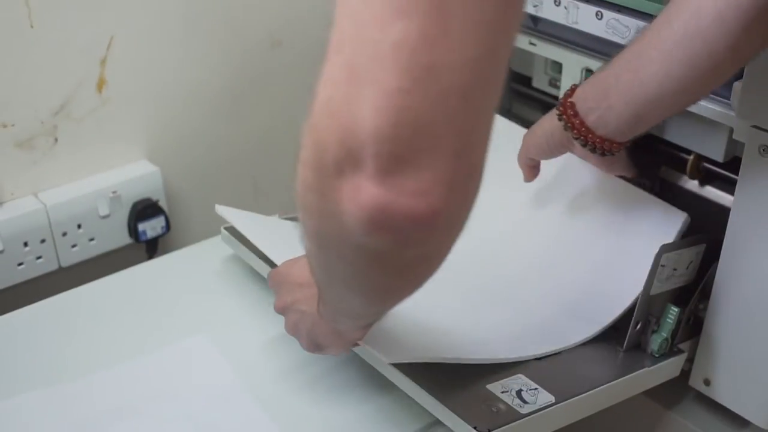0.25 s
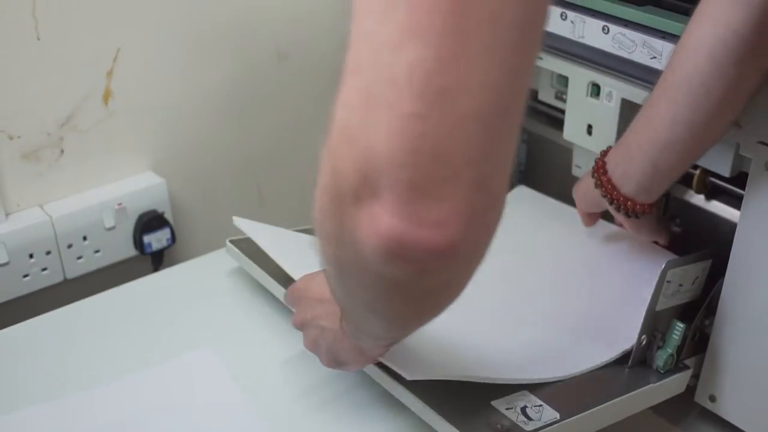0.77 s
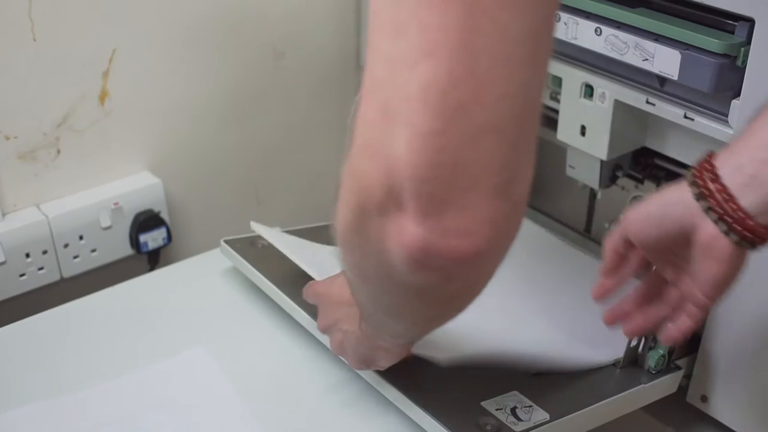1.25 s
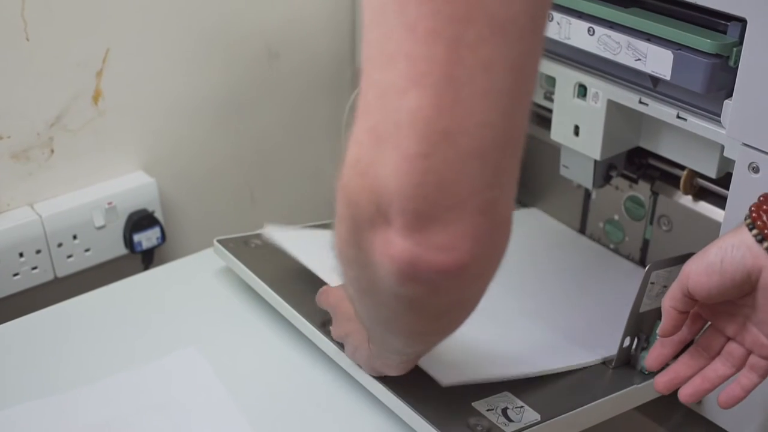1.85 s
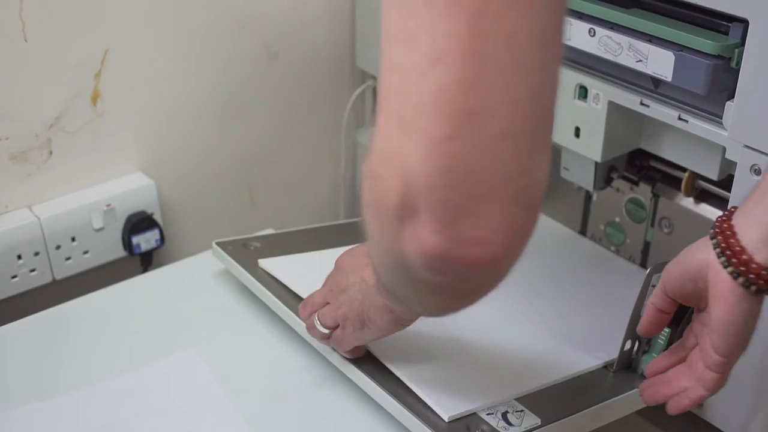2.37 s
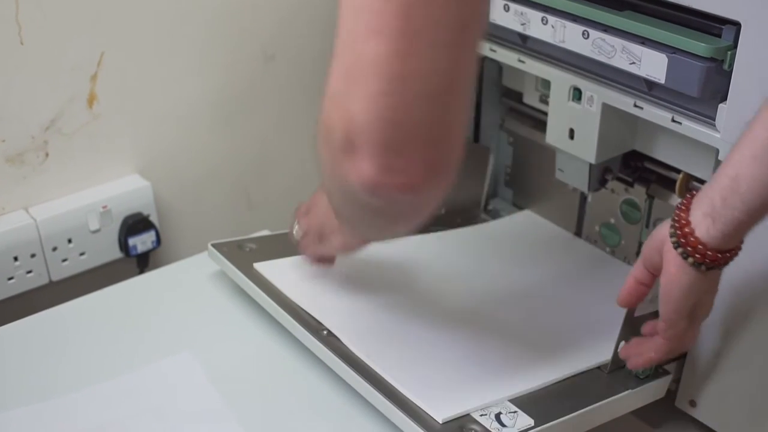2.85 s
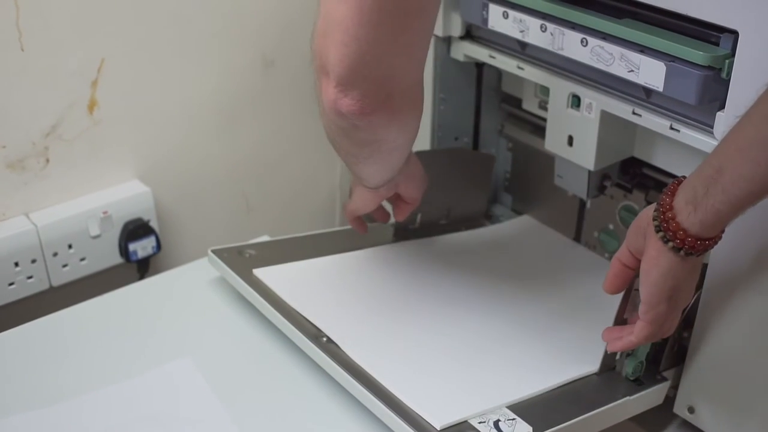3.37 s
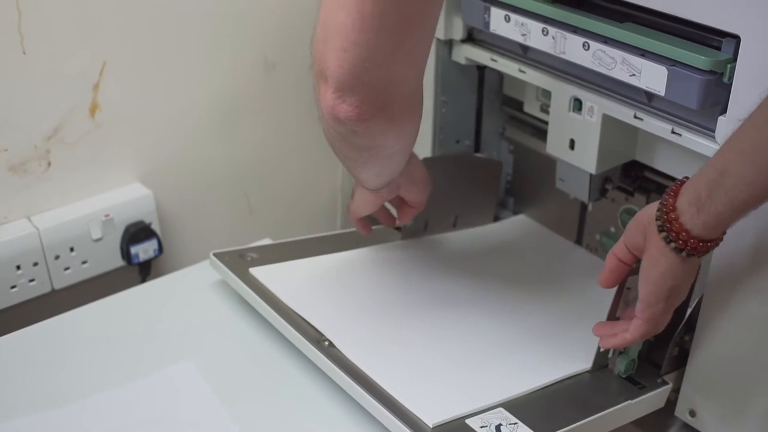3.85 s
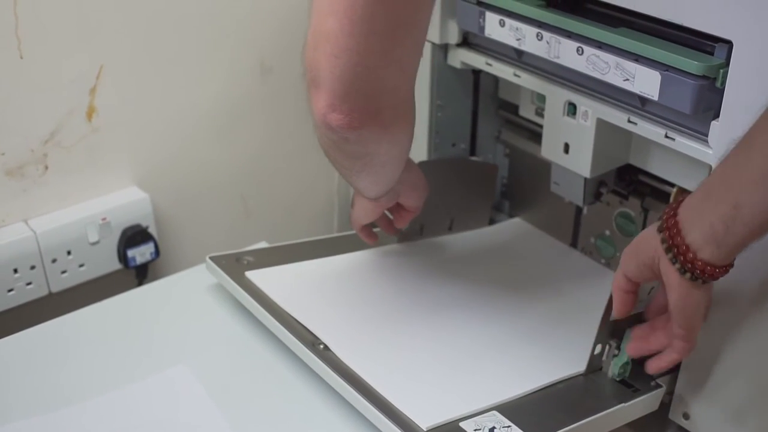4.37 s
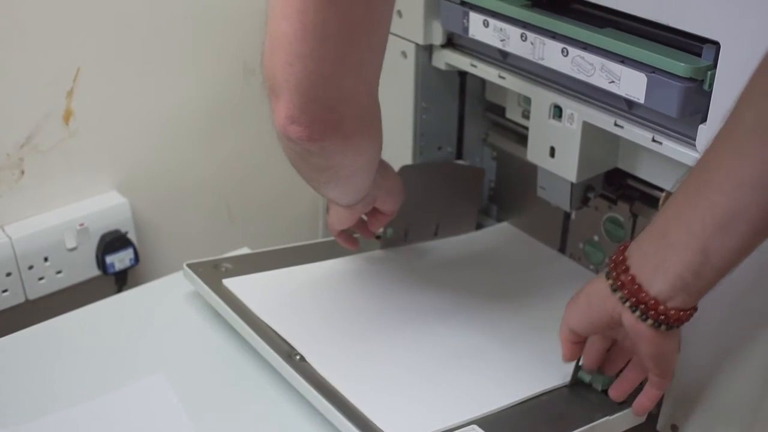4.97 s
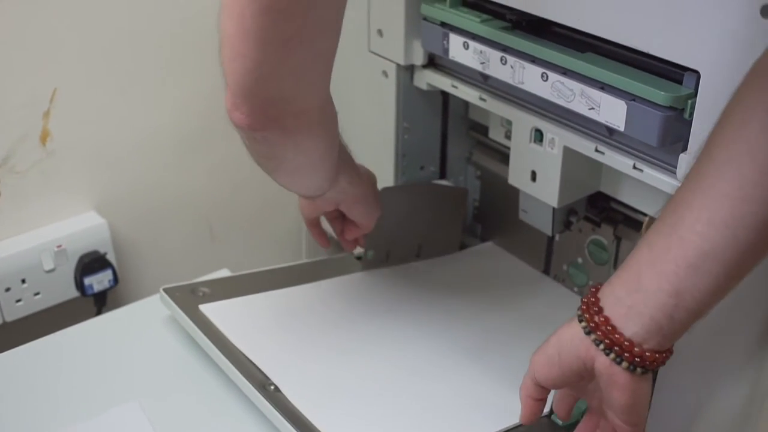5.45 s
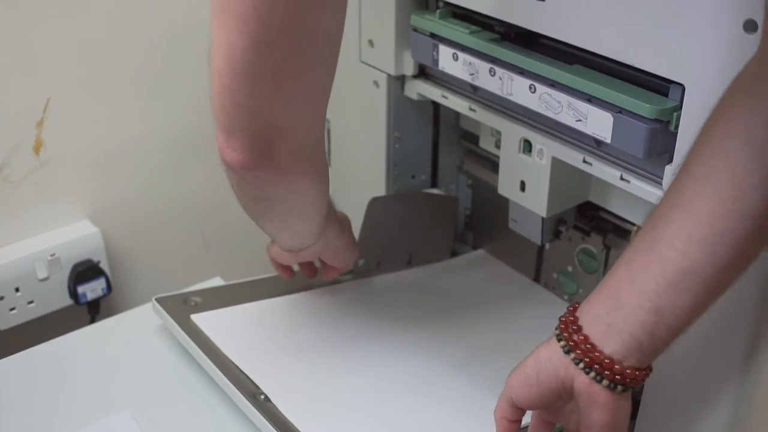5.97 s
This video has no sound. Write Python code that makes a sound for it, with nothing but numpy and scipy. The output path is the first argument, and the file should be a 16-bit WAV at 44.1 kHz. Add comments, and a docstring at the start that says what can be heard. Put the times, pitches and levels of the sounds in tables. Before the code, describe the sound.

A thick stack of paper drops onto a metal tray with heavy thumps, then slides, taps and guide clicks over faint machine hum.

```python
"""A small hard-walled room with a humming machine fan, heard through two unequal capsules.
A stack of paper is dropped, slid and squared on a sheet-metal feed tray; side guides scrape in and click.
Each blow is a noise burst of tiny contacts that rings the tray's modes; strokes are coloured friction noise.
Small steel parts chink as rattled resonances, and delayed trips between the walls make the room's answer."""
import sys
import numpy as np
from scipy import signal
from scipy.fft import rfft, irfft, next_fast_len
from scipy.io import wavfile
from scipy.ndimage import uniform_filter1d

SR = 44100
rng = np.random.default_rng(int(sys.argv[2]) if len(sys.argv) > 2 else 0)


def output_pcm(signal):
    """Save a mono or channel-first signal as 16-bit PCM at the path in sys.argv[1].

    Samples are clipped to [-1, 1] before scaling.
    """
    pcm = np.clip(np.atleast_2d(signal).T, -1, 1) * 32767
    wavfile.write(sys.argv[1], SR, np.round(pcm).astype(np.int16))


N = 273861


def from_db(db):
    """Amplitude factor for a level in dB."""
    return 10 ** (np.asarray(db) / 20)


def rms_one(x):
    """Scale a sound, all channels together, to rms 1."""
    return x / np.sqrt(np.mean(x ** 2) + 1e-20)


def at_hz(points, hz):
    """Read a curve over log frequency, flat beyond its ends."""
    point_hz, values = np.array(points).T
    return np.interp(np.log(hz), np.log(point_hz), values)


def bins_hz(length):
    """Frequencies of a spectrum's bins, kept off zero."""
    return np.maximum(np.fft.rfftfreq(length, 1 / SR), 1)


def panned(db):
    """Left and right gains for a level difference in dB, left over right."""
    return from_db(np.multiply.outer([.5, -.5], db))


def left_right(mid, side, mid_power, side_power):
    """Mid reaches both channels alike, side reaches them with opposite sign."""
    return np.sqrt(mid_power) * mid + np.sqrt(side_power) * side * np.array([[1], [-1]])


def spread(share):
    """Two channels of white noise with a share that is unlike left and right."""
    mid, side = rng.standard_normal((2, N))
    return left_right(mid, side, 1 - share, share)


def drift(rate_hz):
    """Chance wandering mostly slower than rate_hz, with spread 1."""
    step, settle = 40, 2000   # samples per slow value; slow values dropped while the filter settles
    r = np.exp(-2 * np.pi * rate_hz * step / SR)
    white = rng.standard_normal(N // step + 2 + settle)
    slow = signal.lfilter([1], [1, -2 * r, r * r], white)[settle:]
    return np.interp(np.arange(N) / step, np.arange(len(slow)), rms_one(slow))


def ring(x, hz, t60_s):
    """A damped resonance: a unit click sets a sine of height 1 ringing."""
    r = from_db(-60 / (t60_s * SR))
    w = 2 * np.pi * hz / SR
    return signal.lfilter([0, np.sin(w)], [1, -2 * r * np.cos(w), r * r], x + 1e-18)


def narrow(hz, width_hz):
    """Noise in one resonance, rms 1: the narrower it is, the longer it rings."""
    t60_s = np.log(1000) / np.pi / width_hz
    return rms_one(ring(rng.standard_normal(N), hz, t60_s))


def band(x, low_hz, high_hz):
    """Pass the sound between two frequencies."""
    return signal.sosfilt(signal.butter(2, [low_hz, high_hz], "band", fs=SR, output="sos"), x)


def highpass(x, low_hz):
    """Remove the sound below a frequency."""
    return signal.sosfilt(signal.butter(2, low_hz, "high", fs=SR, output="sos"), x)


def coloured(x, spectrum):
    """Steady colouring to rms 1, falling away below the spectrum's first point."""
    hz = bins_hz(N)
    bass_fall = np.minimum(1, hz / spectrum[0][0]) ** 2
    return rms_one(irfft(rfft(x) * from_db(at_hz(spectrum, hz)) * bass_fall, N))


def banded(white, gain_at):
    """Half-octave bands of stereo noise, alike left and right in the bass, each under gain_at(hz)."""
    # likeness of left and right: hz, correlation
    likeness = [(60, 1), (250, 0.81), (1000, 0.74), (3000, 0.15), (10000, 0.53)]
    edges_hz = 22 * 2 ** np.arange(0, 9.8, .5)
    out = 0
    for k, (low, high) in enumerate(zip(edges_hz, edges_hz[1:])):
        mid, side = band(white[k % 2], low, high)   # neighbouring bands draw on different noise
        hz = np.sqrt(low * high)
        alike = at_hz(likeness, hz)
        out = out + gain_at(hz) * left_right(mid, side, 1 + alike, 1 - alike)
    return out


def machine(patchy_db):
    """Broad fan noise with flickering bands, a wavering whine of narrow resonances, and the cabinet's low shudder."""
    # colour of the fan noise: hz, relative_level_db (per Hz)
    fan_colour = [(15, -35), (25, -14), (64, 3), (285, -2.5), (427, -5), (476, -7), (560, -18.5),
                  (754, -7.5), (911, -4.5), (1440, -20), (1700, -12), (2160, -17.5), (8830, -29.5),
                  (13600, -25.5), (16000, -41)]
    # fan whine: pitch_hz, width_hz, level_db
    whines = [(442, 40, -68.5), (573.4, 72, -65), (1150, 120, -76)]
    # level of the cabinet's shudder: time_s, level_db
    shudder_level = [(0.0, -38), (0.05, -39), (0.31, -66), (0.41, -32.5), (0.55, -63), (0.81, -52.5),
                     (1.19, -70.5), (1.38, -53.5), (1.66, -56), (1.8, -47), (1.94, -73), (2.16, -57),
                     (2.56, -74.5), (2.8, -55), (2.9, -70), (3.11, -45), (3.34, -66), (4.39, -70.5),
                     (4.44, -53.5), (4.6, -75), (5.0, -53), (5.57, -80), (5.67, -56.5), (6.21, -73)]

    def band_gain(hz):
        return from_db(at_hz(fan_colour, hz) + patchy_db * drift(2.2))

    fan = from_db(-61) * rms_one(banded(rng.standard_normal((2, 2, N)), band_gain))
    whine = sum(from_db(db) * narrow(hz, width_hz) for hz, width_hz, db in whines)
    time_s, level_db = np.transpose(shudder_level)
    shudder_gain = from_db(np.interp(np.arange(N) / SR, time_s, level_db))
    shudder = shudder_gain * rms_one(band(narrow(54.6, width_hz=35), 28, 92))
    return fan + whine + shudder


def room(x):
    """Sound circles between the walls, losing level by band on each trip, and is scattered by the furniture."""
    # decay of the room: hz, t60_s
    decay = [(60, 0.61), (250, 0.45), (1000, 0.36), (4000, 0.46), (9000, 0.095), (15000, 0.72)]
    # wall-to-wall trips, two rows: heard alike left and right, heard unlike: trip_ms
    paths_ms = [
        [5.3, 7.1, 8.9, 11.3, 13.9, 16.7, 19.1, 22.3, 25.9, 29.3, 33.1, 37.7],
        [6.1, 9.7, 12.1, 14.9, 17.3, 20.9, 23.3, 27.1, 31.3, 35.3],
    ]
    # short delays of the scattering: delay_ms
    scatter_ms = [1.3, 2.9, 4.7]
    # likeness of the echoes left and right: hz, correlation
    echo_likeness = [(60, .99), (250, .96), (500, .88), (1000, .75), (2000, .68), (8000, .55)]
    size = next_fast_len(N + SR)
    hz = bins_hz(size)

    def delay(ms):
        return np.exp(-2j * np.pi * hz * ms / 1000)

    def circling(ms, sign):
        trip = from_db(loss_db_per_ms * ms) * delay(ms)
        return sign * trip / (1 - trip)   # one trip, two trips, three...

    loss_db_per_ms = at_hz([(f, -.06 / t60_s) for f, t60_s in decay], hz)
    echoes = np.array([sum(circling(ms, (-1) ** k) for k, ms in enumerate(row)) for row in paths_ms])
    # so many paths overlap that no broad band is favoured
    broad_power = uniform_filter1d(abs(echoes) ** 2, size=size // 600, axis=1)
    mid, side = echoes / np.sqrt(broad_power)
    # all-pass: smears in time, keeps the balance of pitches
    scatter = np.prod([(delay(ms) - .6) / (1 - .6 * delay(ms)) for ms in scatter_ms], axis=0)
    alike = at_hz(echo_likeness, hz)
    answer = scatter * left_right(mid, side, 1 + alike, 1 - alike)
    return irfft(rfft(x.mean(axis=0), size) * answer, size)[:, :N]


def sliding(rough_db, unlike):
    """Friction noise of paper fibres, made grainy by a fast uneven grip; each stroke swells, holds and fades."""
    # strokes: full_speed_s, swell_s, hold_s, fade_s, sheet_hiss_db, edge_rasp_db, guide_rub_db
    strokes = [(0.001, 0.0056, 0.053, 0.04, -39.5, -68, -44.5), (0.159, .06, 0.069, 0.083, -48.5, -62, -56),
               (0.88, 0.1, 0.019, 0.059, -46, -68, -87), (0.95, 0.038, .01, 0.1, -56, -72, -79),
               (1.202, 0.12, 0.044, 0.14, -53.5, -58.5, -62.5),
               (1.298, .12, 0.027, 0.48, -48.5, -53.5, -56), (1.428, .03, 0.0063, 0.039, -55, -56, -54.5),
               (1.493, 0.05, 0.014, 0.19, -55, -51, -59.5), (1.632, .1, 0.075, 0.032, -68, -68, -84),
               (1.954, 0.039, 0.033, 0.073, -59, -70, -64), (2.112, 0.09, 0.0085, 0.032, -31, -45, -41.5),
               (2.139, 0.0072, .008, 0.045, -13.5, -23, -44), (2.189, 0.044, 0.025, .15, -37, -38.5, -54),
               (2.312, 0.084, 0.024, 0.099, -50, -68, -59.5), (2.931, .07, .04, .1, -68, -76, -71.5),
               (2.994, 0.047, 0.011, 0.16, -54, -67, -62), (3.056, 0.013, 0.05, 0.074, -42.5, -58.5, -69.5),
               (3.164, 0.034, .005, 0.029, -35, -57, -61), (3.191, 0.033, 0.036, 0.19, -48.5, -73.5, -64.5),
               (3.391, .06, 0.026, 0.11, -81, -58.5, -63.5), (3.467, 0.089, 0.036, 0.15, -61, -62.5, -52),
               (3.769, 0.029, 0.0071, 0.13, -71, -46, -62), (4.114, 0.011, 0.008, .12, -75, -56, -57),
               (4.678, 0.029, 0.026, 0.066, -60, -63.5, -69.5),
               (4.733, 0.018, 0.0092, 0.076, -39.5, -43, -68),
               (4.867, 0.0071, 0.0048, 0.15, -35.5, -46.5, -44.5),
               (5.213, 0.0092, 0.005, 0.055, -59, -66.5, -56.5),
               (5.469, 0.013, 0.055, 0.084, -60.5, -89, -68), (5.63, 0.004, 0.02, 0.14, -40, -54, -46.5),
               (5.765, 0.22, 0.087, 0.15, -38.5, -77, -46)]
    # sheets hissing over each other: hz, relative_level_db (per Hz)
    sheet_colour = [(4000, -17.5), (7000, -7.5), (10000, 1), (13000, -3), (15500, 2.5)]
    # paper edge rasping on metal: hz, relative_level_db (per Hz)
    rasp_colour = [(900, -22), (1700, -13), (2600, -12), (3050, -7), (3300, 0), (3550, -6), (4000, -12),
                   (6000, -26)]
    # guide rubbing: hz, relative_level_db (per Hz)
    scrape_colour = [(2500, -9.5), (4000, -4.5), (5200, 0.5), (6500, -2.5), (8000, -4), (11000, -50)]
    range_db = 30   # drop over one swell or fade time
    t = np.arange(0, N, 32) / SR
    gains = 0
    for start, swell, hold, fade, *levels_db in strokes:
        before = (start - t) / max(swell, .002)
        after = (t - start - hold) / max(fade, .002)
        away = np.maximum(np.maximum(before, after), 0)
        gains = gains + np.outer(from_db(levels_db), from_db(-range_db * away))
    out = 0
    for gain, colour in zip(gains, [sheet_colour, rasp_colour, scrape_colour]):
        grip = spread(unlike) * from_db(rough_db * drift(220))
        out = out + np.interp(np.arange(N) / SR, t, gain) * coloured(grip, colour)
    return out


def pings():
    """Loose steel parts chink with a few ms of rattle; modes far from the most excited pitch are weaker."""
    # chinks of the guides' small steel parts: start_s, relative_level_db, most_excited_hz
    chinks = [(2.0544, -33.5, 8900), (2.9851, -44, 15100), (3.057, -29.5, 9100), (3.162, -19.5, 10300)]
    # modes of the steel parts: pitch_hz, relative_level_db, t60_s
    steel_modes = [(8040, -2, .03), (9250, -6, .07), (9390, -6, .06), (10230, -5, .09), (10300, -1, .13),
                   (10420, -4, .09), (14950, 2, .07), (15200, 0, .06)]
    out, age = np.zeros(N), np.arange(SR // 20) / SR
    for start, db, best_hz in chinks:
        rattle = np.zeros(N)
        rattle[round(start * SR):][:len(age)] = rng.standard_normal(len(age)) * np.exp(-age / .005)
        for hz, mode_db, t60_s in steel_modes:
            octaves_away = abs(np.log2(hz / best_hz))
            # -34 dB offsets the build-up of the rattle in the modes
            out += from_db(db + mode_db - 34 - 15 * octaves_away) * ring(rattle, hz, t60_s)
    return out * panned(7.8)[:, None]


def blows(ring_db):
    """A burst of tiny contacts swells and dies: a thud sloping away from its strongest pitch, ringing the tray."""
    # blows on the tray: start_s, level_db, strongest_hz,
    # fall_below_db_per_octave, fall_above_db_per_octave, contact_s
    hits = [(.002, -28, 500, 0, 4, 0.069), (.004, -29.5, 2640, 12, 10.5, 0.044),
            (.038, -8.5, 473, 2.5, 6.5, 0.013), (0.041, -7.5, 116, -7, 20, 0.011),
            (.078, -19, 420, 20, 26, 0.023), (0.126, -26, 315, 29, 12.5, 0.0084),
            (.39, -8.5, 278, 17, 4.5, 0.042), (0.391, -4.5, 135, 13, 7, 0.016),
            (.408, -8, 403, 14, 4, 0.015), (.418, -13, 546, 3.5, 9, 0.014),
            (0.392, -18, 2540, 9, 6.5, 0.023), (.417, -17.5, 1700, 5, 10.5, 0.023),
            (0.457, -10.5, 530, 3, 7, 0.0053), (.484, -14.5, 293, 32, 16, 0.023),
            (1.425, -41, 1400, 1.5, 3, 0.015), (1.498, -32, 676, 3.5, 8, 0.056),
            (1.509, -31.5, 890, 6, 17, 0.024), (1.543, -32.5, 254, 18, 9, 0.042),
            (1.696, -44.5, 450, 14, 8, 0.038), (1.755, -37, 442, 13, 14.5, 0.037),
            (1.92, -36, 710, 8, 14.5, 0.032), (1.946, -35, 460, 11.5, 8, 0.023),
            (2.09, -32.5, 145, 9, 5.5, 0.033), (2.103, -28, 495, 10, 5, 0.09),
            (2.14, -15.5, 1300, 4.5, 4.5, 0.024), (2.2, -19.5, 416, 2.5, 3.5, 0.021),
            (2.211, -23.5, 187, 0.5, 5, 0.032), (2.214, -21.5, 445, 4, 1, 0.016),
            (2.465, -42, 301, 11.5, 8.5, 0.024), (2.884, -54, 2910, 6, 7, 0.025),
            (2.985, -63, 580, 2, 1.5, 0.013), (3.055, -36, 3450, 22, 16, 0.015),
            (3.081, -35, 3000, 27, 10, 0.011), (3.082, -42, 392, 4.5, 2.5, 0.047),
            (3.159, -49.5, 424, -2, -1, 0.014), (3.472, -38.5, 409, 3.5, 6.5, 0.039),
            (3.579, -46.5, 413, 8.5, 6, 0.017), (3.59, -46, 121, 6, 20, 0.025),
            (3.735, -36.5, 633, 17, 6.5, 0.069), (3.767, -26.5, 473, 13, 5, 0.033),
            (3.786, -31.5, 1190, 8.5, 21.5, 0.0056), (3.805, -37, 353, 1, 4.5, 0.016),
            (4.112, -36, 448, 19, 4, 0.016), (4.128, -31.5, 644, 16, 8, 0.015),
            (4.389, -42, 306, -2.5, 13, 0.023), (4.416, -43, 157.5, 0, 14, 0.036),
            (4.491, -48, 120.3, 6.5, 18, .04), (4.679, -44.5, 1790, 1, 9, 0.034),
            (4.726, -30, 1070, 8.5, 3.5, 0.017), (4.728, -35, 2400, 4, 6, 0.018),
            (4.748, -27.5, 760, 13, 15, 0.012), (4.84, -31.5, 1030, 7.5, 12, 0.03),
            (4.867, -13, 1160, 6.5, 13, 0.0093), (4.878, -18.5, 299, 5, 3.5, 0.019),
            (4.884, -27, 154, 5, 3.5, 0.03), (5.204, -26, 1027, 17, 19.5, 0.019),
            (5.208, -37, 1710, 3, 22.5, 0.018), (5.212, -47.5, 6800, 11.5, 14.5, 0.025),
            (5.21, -28.5, 149.6, 8, 14.5, 0.035), (5.221, -31.5, 245, 5.5, 15, 0.022),
            (5.276, -39, 220, 4, 16.5, 0.027), (5.634, -40.5, 148, -7, 5, 0.016),
            (6.005, -53, 564, 0, 3.5, 0.021), (6.137, -40.5, 570, 13, 12, 0.015)]
    # tray modes, damped by the paper: pitch_hz, relative_level_db, t60_s
    tray_modes = [(121.3, 2, 0.16), (147.1, 2.5, .25), (199, -6.5, 0.22), (227.5, -2.5, 0.22),
                  (267.2, 0.5, 0.14), (301.5, -4.5, 0.23), (382, -3, 0.19), (400, -2.5, .12),
                  (454, -1, 0.18), (538, 2, 0.14), (584, 9, 0.027), (683, -10.5, .07), (815, -14, 0.0594),
                  (950, -10, 0.017), (1093, -24.5, 0.017), (1580, 1.5, 0.031)]
    # part of a blow unlike left and right: hz, power_share
    unlike = [(145, .01), (300, .025), (600, .05), (1300, .1), (2900, .16), (8400, .22)]
    lowest_hz = 93.3   # the tray radiates little below
    spot_db, spot_octaves = 6, .18   # the struck spot stands out of the slopes: height, width
    thud, age = np.zeros((2, N)), np.arange(8192) / SR
    hz = bins_hz(len(age))
    share = at_hz(unlike, hz)
    for start, level_db, strongest_hz, below_db, above_db, contact_s in hits:
        at = round(start * SR)
        rise_s = .003 * np.exp(-.0534 * (level_db + 30))   # harder blows rise faster
        shape = (1 - np.exp(-(age / rise_s) ** 2)) * np.exp(-age / max(contact_s, .001))
        octaves = np.log2(hz / strongest_hz)
        slope_db = abs(octaves) * np.where(octaves < 0, below_db, above_db)
        octave_db = spot_db * (np.exp(-(octaves / spot_octaves) ** 2) - 1) - slope_db
        # sqrt(SR / hz) gives each octave equal power before the slopes
        colour = from_db(level_db + octave_db) * np.sqrt(SR / hz) / (1 + (lowest_hz / hz) ** 2)
        mid, side = rfft(rng.standard_normal((2, len(age))))
        burst = shape * irfft(colour * left_right(mid, side, 1 - share, share))
        # every burst gets its expected level, whatever the noise drawn
        burst_rms = np.sqrt(np.mean(colour ** 2) * np.mean(shape ** 2))
        thud[:, at:at + len(age)] += (burst_rms * rms_one(burst))[:, :N - at]
    thud = highpass(thud, lowest_hz)
    tray = 0
    for k, (mode_hz, db, t60_s) in enumerate(tray_modes):
        tray = tray + (-1) ** k * from_db(db) * ring(thud, mode_hz, t60_s)
    return thud + from_db(ring_db) * tray


def scene():
    """Blows, chinks and strokes heard directly and through the room, over the machine."""
    struck = blows(ring_db=-52) + pings()
    rubbed = sliding(rough_db=1.5, unlike=.2)
    answer = room(from_db(-10) * struck + from_db(-21) * rubbed)
    return struck + rubbed + answer + machine(patchy_db=.6)


def record(dry):
    """The left capsule is brighter, the deepest bass is lost, peaks are rounded, the top is cut steeply."""
    # difference between the two capsules: hz, left_over_right_db
    lean = [(300, -1), (2000, 0), (6000, 1), (9000, 1.5), (13000, 5.5)]
    leaning = irfft(rfft(dry) * panned(at_hz(lean, bins_hz(N))), N)
    thinned = highpass(leaning, 40)
    rounded = thinned / (1 + (thinned / .9) ** 4) ** .25
    return signal.sosfilt(signal.ellip(10, .5, 60, 16000, fs=SR, output="sos"), rounded)


dry = scene()
out = record(dry)
output_pcm(out)
```